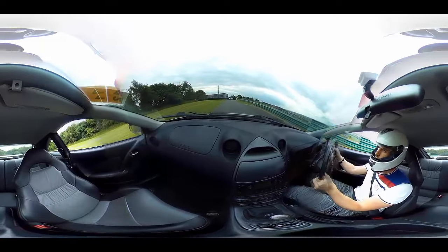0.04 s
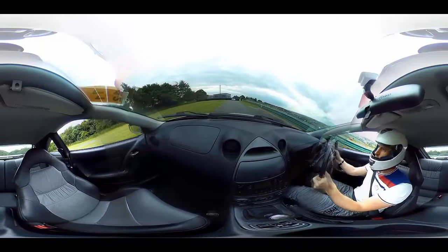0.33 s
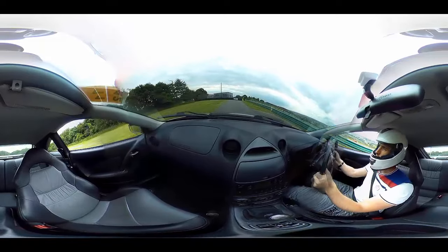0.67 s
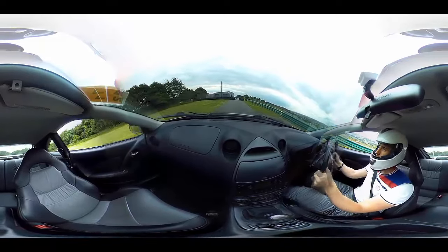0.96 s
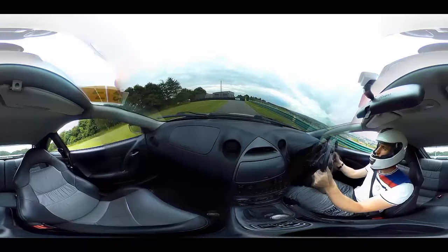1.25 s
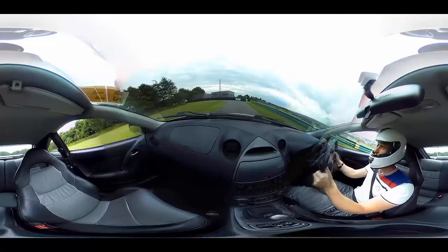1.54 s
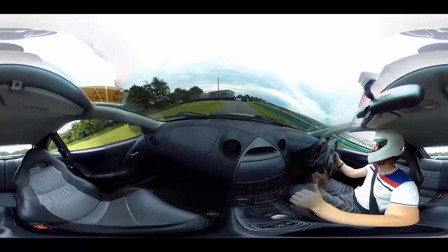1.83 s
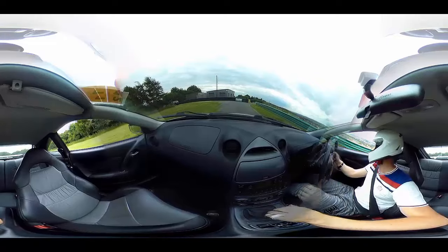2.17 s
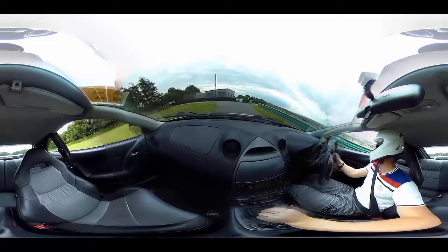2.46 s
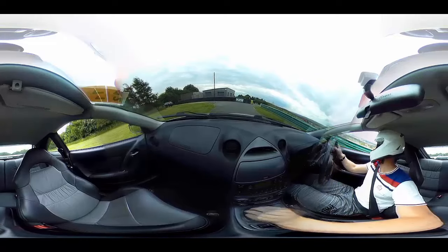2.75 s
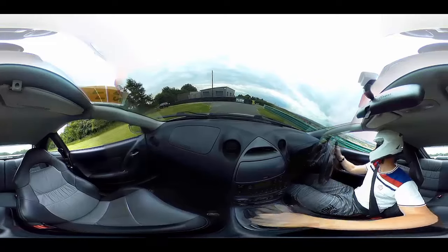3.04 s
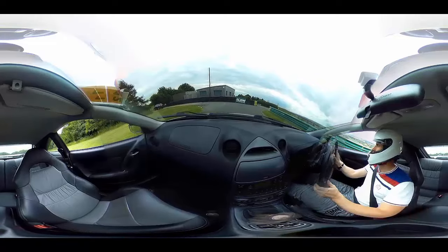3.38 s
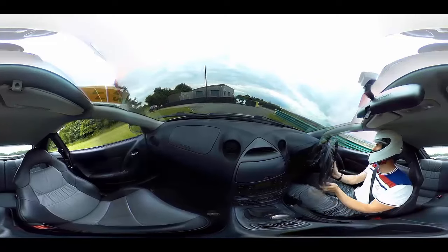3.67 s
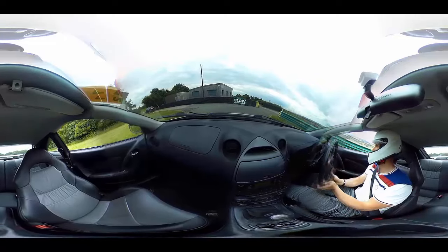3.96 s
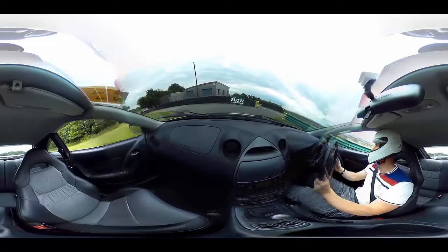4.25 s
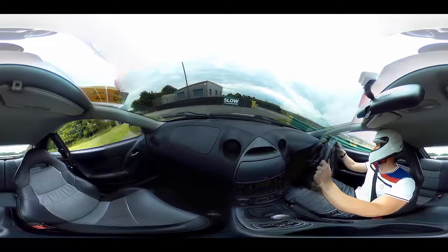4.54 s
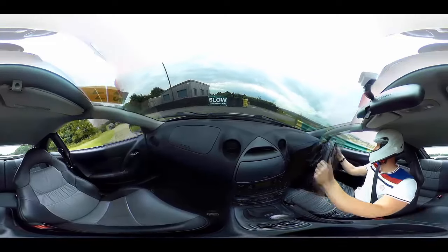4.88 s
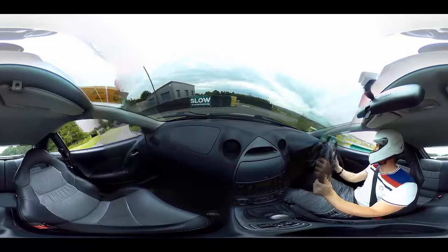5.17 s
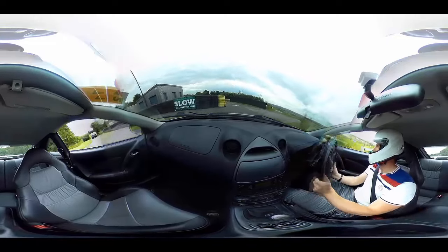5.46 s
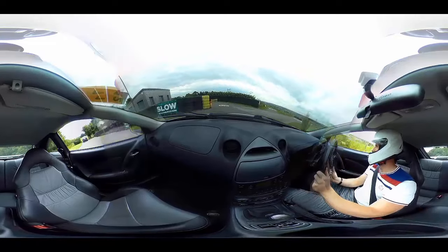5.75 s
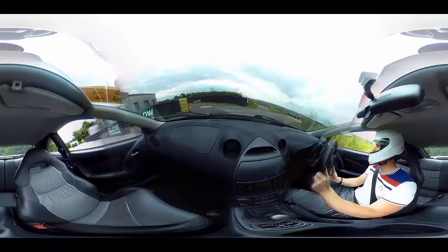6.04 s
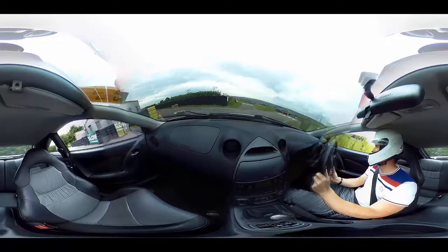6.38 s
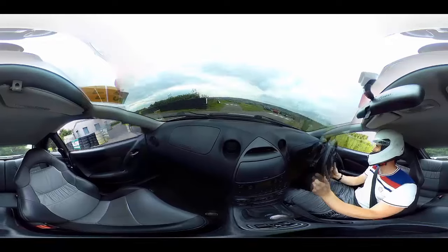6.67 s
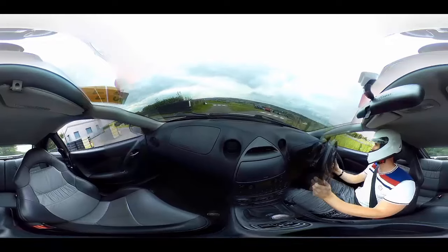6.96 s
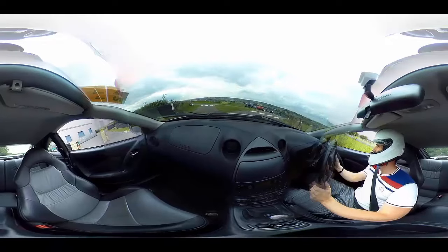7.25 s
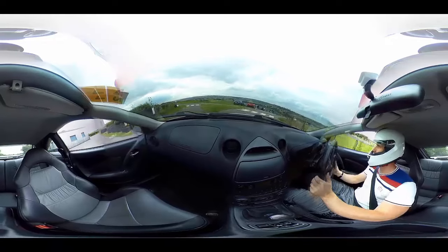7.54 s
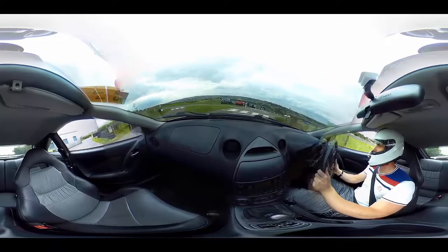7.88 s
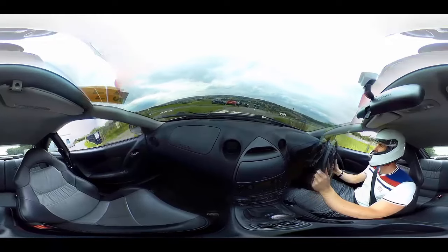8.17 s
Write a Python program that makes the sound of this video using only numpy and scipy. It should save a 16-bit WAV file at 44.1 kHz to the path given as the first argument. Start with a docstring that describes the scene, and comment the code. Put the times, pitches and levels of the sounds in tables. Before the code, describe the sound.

A car slows on a track, heard from the cabin: engine winding down, fading tyre roar, then plastic chatter, clicks and knocks.

```python
"""A car engine, heard from inside, falls from high revs to idle as the car slows on a track and turns.
Its overtones sweep through the cabin's resonances. While it shudders, a small loose part chatters
against its seat, then goes on ticking over the rough ground. The driver's hand knocks and scuffs
on the console and wheel, and plastic catches snap. Underneath, the body shakes and heaves on its
springs, and the rumble and roar of the tyres fade with the speed."""
import sys
import numpy as np
from scipy import signal
from scipy.fft import rfft, irfft, next_fast_len
from scipy.io import wavfile
from scipy.ndimage import uniform_filter1d

SR = 44100
rng = np.random.default_rng(int(sys.argv[2]) if len(sys.argv) > 2 else 0)


def int16_out(signal):
    """Quantize to a 16-bit WAV file."""
    q = np.round(np.clip(np.atleast_2d(signal).T, -1, 1) * 32767)
    wavfile.write(sys.argv[1], SR, q.astype(np.int16))


N = 366471
T = np.arange(N) / SR


# The falling revs. Each row: time in seconds, firing rate in Hz.
FIRING_RATE = [(0, 128.4), (.35, 118.6), (.7, 113), (1, 105.1), (1.7, 90.4), (2, 84), (2.3, 78.26),
               (2.65, 72.4), (3, 54.3), (3.3, 42.16), (3.7, 26.84), (4.2, 27), (5.2, 32), (5.75, 45.33),
               (6.4, 42.7), (7.1, 39.88), (7.6, 36.98), (8.31, 34.45)]
# The engine's faders. Each row: time in seconds, low tone in dB, overtones in dB.
ENGINE_LEVELS = [(0, -26.5, -40), (.45, -33, -54), (.8, -39.5, -46), (1.35, -37.5, -45), (1.58, -35, -51),
                 (1.7, -37.5, -44.5), (2, -40, -47.5), (2.45, -40.5, -53), (2.8, -32, -49.5),
                 (3.3, -35, -48.5), (3.9, -51, -47), (4.5, -44, -49), (5.6, -37, -63), (6.2, -32.5, -59),
                 (6.75, -30.5, -72), (7.2, -33.5, -49), (7.75, -48, -49.5), (8.31, -47, -64)]
# Each row: multiple of the firing rate, level in dB relative to the overtone fader.
OVERTONES = [(1.5, -4), (2, 2), (2.5, -7.5), (3, 1.5), (3.5, -12.5), (4, -5.5), (4.5, -16), (5, -8),
             (6, -12), (7, -21.5), (8, -25.5), (9, -18), (10, -19.5), (11, -18), (12, -25), (13, -19.5),
             (14, -19)]
# Air and panels lift passing overtones. Each row: centre in Hz, width in Hz, lift in dB.
CABIN_MODES = [(256, 46, 14), (740, 70, 7), (1120, 130, 7), (1310, 64, 11)]

def engine(waver=0.002, uneven=0.23, jitter_rad=0.044, rough_db=0.7):
    """A low tone and overtones sweep through the cabin's resonances, roughened by uneven firing."""
    firing_hz = curve(FIRING_RATE) * (1 + waver * drift(13))
    phase = 2 * np.pi * np.cumsum(firing_hz) / SR + jitter_rad * drift(31)
    overtones_db = curve(ENGINE_LEVELS, column=2) + rough_db * drift(35)
    partials = [(0.98, curve(ENGINE_LEVELS))]  # the low tone sits just under the firing rate
    for multiple, db in OVERTONES:
        partials.append((multiple, overtones_db + db + lift_db(multiple * firing_hz, CABIN_MODES)))
    out = np.zeros(N)
    for multiple, db in partials:
        gain = amp(db) * (1 + uneven * drift(3.4))
        out += gain * np.sin(multiple * phase + 2 * np.pi * rng.random())
    return np.sqrt(2) * out


# The loose part lands. Each row: start in seconds, strength in dB, hard edge in relative dB.
TICKS = [(3.6835, -29.5, -28), (3.7449, -14, -33), (3.7891, -14.5, -9), (3.8349, -13.5, -28),
         (3.8828, -16.5, -34), (3.9284, -31, -26), (3.9742, -19, -25), (4.0196, -17.5, -13),
         (4.066, -16, -33), (4.1142, -25, -22), (4.1617, -32, -32), (4.234, -45, -25), (4.2499, -44, -15),
         (4.281, -36.5, -20), (4.3022, -41, -25), (4.3321, -28, -26), (4.5543, -30.5, -13),
         (4.5753, -32, -7), (4.6066, -33, -9), (4.7314, -39, -25), (4.7481, -35, -32), (4.7806, -27.5, -21),
         (4.9574, -35, -25), (5.0146, -36, -10), (5.7739, -35, -22), (5.7937, -23, -26), (6.2284, -39, -20),
         (6.27, -41, -22), (6.3154, -37, -18), (6.4036, -35, -7), (6.4228, -26, -51), (6.4959, -39, -20),
         (6.627, -36, -12), (6.6465, -21.5, -22), (6.7284, -31.5, -11), (6.789, -23.5, -30),
         (6.8362, -27, -42), (6.9031, -31.5, -30), (6.9258, -25, -27), (6.955, -25, -8), (6.978, -20, -11),
         (7.0168, -41, -25), (7.0883, -47, -20), (7.1351, -31, -20), (7.1638, -39, -38), (7.1884, -27, -13),
         (7.488, -33, -32), (7.5087, -35, -31), (7.535, -28.5, -22), (7.555, -24.5, -45), (7.5845, -27, -3),
         (7.602, -29, -30), (7.7057, -32.5, -18), (7.7561, -29, -23), (7.813, -42, -21),
         (7.9875, -29.5, -22), (8.0378, -35, -39)]

def tick_contacts(stray_count=40, stray_db=-43, stray_hard_db=-20, spread_s=0.054, uneven_db=3):
    """Contacts as the loose part is jogged on its seat: the ticks, and faint stray touches nearby."""
    strays = []
    for k in rng.integers(len(TICKS), size=stray_count):
        start = TICKS[k][0] + spread_s * rng.standard_normal()
        strays.append((start, stray_db + uneven_db * rng.standard_normal(), stray_hard_db))
    return strays + list(TICKS)


# Bursts between the ticks. Each row: start in seconds, strength in dB.
CHATTERS = [(3.7245, -18), (3.77, -21), (3.8136, -21.5), (3.8598, -24.5), (3.9040, -24), (3.9495, -24),
            (3.9977, -28), (4.0440, -21), (4.0919, -28.5), (4.1398, -36.5)]
# The contacts of one burst. Each row: strength in relative dB, hard edge in relative dB.
CHATTER_PATTERN = [(-5.5, -4), (-3.5, 3), (-5, -4)]

def chatter_contacts(gap_s=0.0023, scatter_s=0.0003, uneven_db=4):
    """Contacts as the shuddering engine shakes the loose part against its upper stop."""
    contacts = []
    for start, db in CHATTERS:
        for n, (softer_db, hard_db) in enumerate(CHATTER_PATTERN):
            lands = start + n * gap_s + scatter_s * rng.standard_normal()
            contacts.append((lands, db + softer_db + uneven_db * rng.uniform(-1, 1), hard_db))
    return contacts


# The ticks' bright ring near 7 and 8.7 kHz.
# Each row: pitch in Hz, level in dB before the tilt, t60 in seconds.
TICK_MODES = [(6630, -19, 0.0046), (7100, 5.5, 0.003), (8680, 0, 0.0034)]
# Colours of the panel's tap and of the hard edge. Each row: frequency in Hz, level in dB.
PANEL_COLOUR = [(200, 12), (900, 3.5), (1600, 2.5), (2500, -2.5), (3400, -4), (4400, 0), (5400, -14),
                (11000, -30), (16000, -22)]
EDGE_COLOUR = [(1000, -10), (2000, -10), (5000, -20), (7500, -5), (9700, 21), (11800, -4), (13800, 4),
               (16000, -6)]

def rattle(contacts, detune=0.02, rise_s=0.00058, rebound=0.25, ring_db=2, ping_hz=14800):
    """Each contact gives a bright ring, a faint rebound, a click and a tap on the panel behind."""
    t = np.arange(2048) / SR
    band = signal.butter(4, [5900, 9900], "bandpass", fs=SR, output="sos")
    out = np.zeros(N)
    for start, db, hard_db in contacts:
        tilt_db = 20.5 + 0.87 * hard_db  # per octave: hard contacts favour the upper modes
        ring = np.zeros(len(t))
        for hz, mode_db, t60 in TICK_MODES:  # pitch and balance shift a little with every contact
            level_db = mode_db + tilt_db * np.log2(hz) + 2 * rng.standard_normal()
            shifted_hz = hz * (1 + detune * rng.standard_normal())
            ring += decay(t, level_db, t60) * np.sin(2 * np.pi * shifted_hz * t)
        ring *= 1 - np.exp(-t / rise_s)
        blows = decay(t, -27, t60=0.02) * rng.standard_normal(len(t)) / 2  # scatter off nearby surfaces
        blows[0] += 1
        blows[int(rng.uniform(0.0012, 0.004) * SR)] += rebound * rng.random()
        ring = signal.sosfilt(band, signal.fftconvolve(ring, blows)[:len(t)])
        ring *= amp(ring_db) / abs(ring).max()
        tap_db = -21 + 0.45 * db + 0.096 * hard_db  # the panel only partly follows the contact's force
        tap = noise(PANEL_COLOUR, size=len(t)) * decay(t, tap_db, t60=0.021) / 2
        edge = noise(EDGE_COLOUR, size=len(t)) * decay(t, hard_db - 5, t60=0.0049)
        ping = decay(t, -31, t60=0.002) * np.sin(2 * np.pi * ping_hz * t)
        add(out, start, amp(db) * (ring + ping + edge) + tap)
    return out


# Knocks on the console. Each row: start in seconds, level in dB, clatter t60 in seconds,
# brightness in dB per octave, ring pitch in Hz, hollow ring in relative dB, thud in dB.
KNOCKS = [(3.006, -40, 0.13, 4.5, 994, 15.5, -29.5), (3.029, -40.5, 0.064, -1, 1060, 12, -32.5),
          (3.102, -46, .04, -12, 1060, 8.5, -52), (3.315, -32.5, 0.076, -2.5, 1080, -13, -32),
          (3.329, -42, 0.096, 0.5, 1026, 12, -31), (6.8, -35, 0.065, 0, 660, -7, -55),
          (6.8056, -35, 0.053, -4, 670, 3, -50), (6.812, -33.5, 0.039, 1, 1465, 1, -58),
          (6.818, -30.5, 0.084, -4.5, 728, 5.5, -54), (6.831, -39, 0.062, -8, 1730, -4, -58),
          (6.996, -39, 0.089, -4, 934, 0, -55), (7.393, -32, 0.16, -7, 884, -10, -60),
          (7.532, -40.5, 0.081, -2, 1000, -17, -60), (7.562, -41, 0.054, -2, 993, -14, -60)]
# The trim's hollow ring. Each row: multiple of the ring pitch, level in dB, t60 in seconds.
TRIM_MODES = [(1, 0, .055), (2.02, -15, .03), (2.35, -19, .03), (2.85, -20, .035), (3.1, -22, .03),
              (3.85, -17, .035)]
# Colours of the clatter and of the thud. Each row: frequency in Hz, level in dB.
CLATTER_COLOUR = [(100, -23), (450, -1.5), (750, 1.5), (1500, 0), (2500, -9), (4000, -11), (5200, -21),
                  (7000, -15), (9000, -16), (12000, -33), (16000, -42)]
THUD_COLOUR = [(30, -26), (55, -8), (85, 24.5), (130, -8), (250, -2), (460, 7), (700, -49)]

def knocks(rise_s=0.0022, thud_t60=0.15):
    """Blows on damped plastic trim: a short clatter, a hollow ring and a dull thud."""
    t = np.arange(8192) / SR
    attack = 1 - np.exp(-t / rise_s)
    out = np.zeros(N)
    for start, db, t60, bright_db, ring_hz, hollow_db, thud_db in KNOCKS:
        clatter = noise(CLATTER_COLOUR, tilt_db=bright_db, size=len(t)) * decay(t, db, t60)
        ring = sum(decay(t, mode_db, mode_t60) * sine(t, multiple * ring_hz)
                   for multiple, mode_db, mode_t60 in TRIM_MODES)
        thud = noise(THUD_COLOUR, size=len(t)) * decay(t, thud_db, thud_t60)
        add(out, start, attack * (clatter + amp(db + hollow_db) * ring + thud))
    return out


# Catches and trim snapping. Each row: start in seconds, peak in dB.
SNAPS = [(3.01, -29), (3.028, -34), (3.331, -29), (4.194, -30), (4.2128, -21), (7.002, -33)]
# The clicks inside one snap. Each row: delay in seconds, relative gain.
SNAP_CLICKS = [(0, 0.85), (.0004, .8), (.00095, 1), (.0018, 0.32)]
# The colour of a snap. Each row: frequency in Hz, level in dB.
SNAP_COLOUR = [(600, -4), (1200, 5.5), (1900, 2), (2800, 4), (4500, -6), (6900, 1.5), (8000, -10),
               (9000, -1), (11000, -15)]

def snaps(click_t60=0.0032, tail_db=-21, tail_t60=0.013, top_hz=9000):
    """Plastic snaps: a few dry clicks within two milliseconds, scattered by the trim around them."""
    t = np.arange(2048) / SR
    envelope = decay(t, tail_db, tail_t60)
    for delay, gain in SNAP_CLICKS:
        add(envelope, delay, gain * decay(t, 0, click_t60))
    soft_plastic = signal.butter(8, top_hz, fs=SR, output="sos")
    out = np.zeros(N)
    for start, db in SNAPS:
        snap = signal.sosfilt(soft_plastic, envelope * noise(SNAP_COLOUR, size=len(t)))
        add(out, start, amp(db) * snap / abs(snap).max())
    return out


# Each row: start, swell and t60 in seconds, then dull rub, bright swish and airy fizz in dB.
SCUFFS = [(1.726, .004, .07, -44, -37, -46), (2.037, .0015, 0.075, -46, -43.5, -48),
          (2.435, .004, 0.073, -43, -49, -50), (2.808, .003, .046, -45, -51, -58),
          (3.899, 0.011, .17, -48, -46, -70), (4.036, 0.0072, 0.16, -61, -43, -75),
          (5.24, 0.12, 0.64, -71, -66, -51), (5.376, 0.0072, .18, -43.5, -48.5, -62),
          (5.39, 0.081, .4, -66, -56, -58), (5.487, 0.017, 0.13, -47, -36, -41),
          (5.651, 0.0074, 0.17, -51, -49, -64), (5.772, .009, .14, -48, -48, -69),
          (5.887, 0.0072, 0.079, -50, -48, -66), (6.2, .045, .4, -57, -52.5, -70),
          (6.807, 0.0059, 0.076, -39, -43, -78), (6.99, 0.005, .1, -46, -47, -78),
          (7.225, .01, .16, -43.5, -50.5, -68), (7.477, 0.0093, 0.15, -48, -53, -70),
          (7.654, 0.0052, 0.12, -44.5, -40.5, -56)]
# Colours of the rub, the swish and the fizz. Each row: frequency in Hz, level in dB.
RUB_COLOUR = [(150, 0), (600, 5.5), (1000, -2), (1600, 0.5), (2500, -11), (5000, -9), (12000, -28)]
SWISH_COLOUR = [(1000, -27), (2500, -13), (4000, 2), (5500, 2), (7000, 6.5), (8800, 12), (11000, -3),
                (15500, -17)]
FIZZ_COLOUR = [(3000, -25), (6500, -9), (9000, -5), (12000, -3), (15500, 2)]

def scuffs(grain_db=2, gain_db=-2):
    """Hands and sleeves brush the trim in brief, grainy strokes that swell and die away."""
    t = np.arange(SR // 2) / SR
    out = np.zeros(N)
    for start, swell_s, t60, rub_db, swish_db, fizz_db in SCUFFS:
        stroke = np.minimum(t / swell_s, 1) * decay(np.maximum(t - swell_s, 0), 0, t60)
        layers = [(rub_db, RUB_COLOUR), (swish_db, SWISH_COLOUR), (fizz_db, FIZZ_COLOUR)]
        friction = sum(amp(db) * noise(colour, size=len(t)) for db, colour in layers)
        add(out, start, stroke * friction)
    return out * amp(gain_db + grain_db * drift(240))


# Bumps in the track. Each row: time of the peak in seconds, body heave in dB, tyre ring in dB.
BUMPS = [(1.701, -42, -34), (2.88, -36, -51), (3.299, -36, -48.5), (3.76, -24.5, -36.5), (4.77, -48, -41.5),
         (5.62, -43, -45.5)]
TYRE_HZ = 228.3  # the air ringing inside the tyres

def bumps(length_s=0.26, heave_hz=28):
    """Each bump makes the body heave and the air in the tyres ring."""
    t = np.arange(0, length_s, 1 / SR)
    swell = np.sqrt(2) * np.sin(np.pi * t / length_s)
    out = np.zeros(N)
    for peak_s, heave_db, ring_db in BUMPS:
        swing = amp(heave_db) * sine(t, heave_hz) + amp(ring_db) * sine(t, TYRE_HZ)
        add(out, peak_s - length_s / 2, swell * swing)
    return out


# Faders for body shake, tyre ring, and tyre and wind roar. Each row: time in seconds, level in dB.
SHAKE_LEVELS = [(0, -26.5), (1.8, -31), (2.2, -32), (3.6, -35.5), (4.1, -30), (5.3, -31.5), (6.3, -31),
                (6.8, -26), (7.8, -32), (8.31, -31.5)]
TYRE_LEVELS = [(0, -29), (.8, -34), (1.4, -35.5), (2.2, -39.5), (3.4, -45), (4.3, -54.5), (5.8, -45.5),
               (6.8, -51.5), (7.5, -57), (8.31, -50)]
ROAR_LEVELS = [(0, -34.5), (1, -39.5), (2, -44.5), (3, -48), (3.5, -51.5), (3.9, -50.5), (4.6, -51.5),
               (6, -53.5), (6.9, -54), (8.31, -59.5)]
# Colours of the road bed, from lowest to highest. Each row: frequency in Hz, level in dB.
SHAKE_COLOUR = [(5, -26), (14, 5), (25, 10), (45, 12.5), (60, 4), (80, -4), (130, -11), (200, -43.5)]
RUMBLE_COLOUR = [(40, 1), (70, -9), (115, -2.5), (160, 3.5), (195, -4.5), (260, -5), (315, -15), (370, -9),
                 (450, -16.5), (540, -26.5), (900, -66)]
ROAR_COLOUR = [(250, -8), (500, -0.5), (700, 1), (820, -4), (1050, 2), (1500, -5.5), (2000, -10.5),
               (2800, -16), (4000, -17), (5500, -21), (7000, -18.5), (8800, -16.5), (10500, -25),
               (15000, -51)]
HISS_COLOUR = [(1000, 17), (4000, -9), (5600, -9), (6900, 4.5), (7800, 2), (8800, 5), (10500, -6),
               (12500, -28), (14000, -10), (16000, -6)]
# Resonant peaks that colour the roar, with a high sheen near 7 and 8.9 kHz.
# Each row: centre in Hz, width in Hz, lift in dB.
ROAR_PEAKS = [(435.6, 126, 14), (680, 84, 3), (920, 190, 3), (1290, 9.8, 8), (1543, 110, 2.5),
              (2294, 95, 6.5), (3170, 51, -1.5), (6900, 480, 4), (8860, 490, 6)]

def road(lumpy_db=0.84, rumble_follows=0.43, tyre_width_hz=6.3, patchy=0.25, grain_db=0.84, hiss_db=-57):
    """The body shakes, the tyres ring, and rumble and roar fade with the speed over a steady hiss."""
    roar_db = curve(ROAR_LEVELS)
    lumps_db = lumpy_db * drift(6.3)  # the surface is uneven
    shake = amp(curve(SHAKE_LEVELS) - 3 + lumps_db) * noise(SHAKE_COLOUR)
    rumble = amp(rumble_follows * roar_db - 15 + lumps_db) * noise(RUMBLE_COLOUR)
    phase = 2 * np.pi * TYRE_HZ * T
    tyres = drift(tyre_width_hz) * np.cos(phase) + drift(tyre_width_hz) * np.sin(phase)
    tyres *= amp(curve(TYRE_LEVELS))
    # uneven tarmac stirs now one band of the roar, now another
    bands = signal.stft(noise(ROAR_COLOUR, ROAR_PEAKS), nperseg=512)[2]
    patches = uniform_filter1d(rng.standard_normal(bands.shape), size=4, axis=0)
    patches = unit(uniform_filter1d(patches, size=8, axis=1))
    roar = unit(signal.istft(bands * np.exp(patchy * np.tanh(patches)))[1][:N])
    roar *= amp(roar_db + 1 + grain_db * drift(37))
    return shake + rumble + tyres + roar + amp(hiss_db) * noise(HISS_COLOUR)


def cabin(sound, wet_db=-18, t60=0.011):
    """The padded cabin adds a faint, very short tail."""
    t = np.arange(SR // 8) / SR
    tail = rng.standard_normal(len(t)) * decay(t, 0, t60) * (t > 0.002)
    return sound + amp(wet_db) * signal.oaconvolve(sound, tail / np.linalg.norm(tail))[:N]


def amp(db):
    """Decibels to gain."""
    return 10 ** (np.asarray(db) / 20)


def decay(t, db, t60):
    """An envelope that starts at db and falls 60 dB every t60 seconds."""
    return amp(db - 60 * t / t60)


def sine(t, hz):
    """A sine with a random starting phase."""
    return np.sin(2 * np.pi * (hz * t + rng.random()))


def unit(x):
    """Scales to rms 1."""
    return x / np.sqrt(np.mean(x ** 2) + 1e-20)


def curve(rows, column=1):
    """One column of a time table, at every sample."""
    rows = np.asarray(rows, float)
    return np.interp(T, rows[:, 0], rows[:, column])


def lift_db(hz, modes):
    """The boost that a set of resonances gives at a frequency."""
    return sum(db / (1 + (2 * (hz - centre) / width) ** 2) for centre, width, db in modes)


def noise(colour, modes=(), tilt_db=0, size=N):
    """Noise of rms 1 with a colour, resonances and a tilt per octave."""
    length = next_fast_len(size)
    hz = np.fft.rfftfreq(length, 1 / SR) + 1
    points_hz, points_db = np.transpose(colour)
    db = np.interp(np.log(hz), np.log(points_hz), points_db)
    db += lift_db(hz, modes) + tilt_db * np.log2(hz)
    return unit(irfft(rfft(rng.standard_normal(length)) * amp(db), length)[:size])


def drift(rate_hz):
    """A random wander of rms 1 that rolls off above the given rate."""
    length = next_fast_len(N)
    hz = np.fft.rfftfreq(length, 1 / SR)
    return unit(irfft(rfft(rng.standard_normal(length)) * np.exp(-(hz / rate_hz) ** 2), length)[:N])


def add(mix, start, sound):
    """Mixes a sound in at a start time in seconds."""
    part = mix[max(round(start * SR), 0):][:len(sound)]
    part += sound[:len(part)]


def scene():
    """Engine and road with the small, close sounds of the cabin, in mono."""
    driving = engine() + road() + bumps()
    close_sounds = rattle(chatter_contacts() + tick_contacts()) + snaps() + knocks() + scuffs()
    return (driving + cabin(close_sounds))[None]


def record(dry, whine_hz=13714.3, whine_db=-65, top_hz=15900):
    """Adds a thin electronic whine and cuts the highest treble."""
    whine = np.sqrt(2) * amp(whine_db) * np.sin(2 * np.pi * whine_hz * T)
    low_pass = signal.firwin(511, top_hz, window=("kaiser", 9), fs=SR)
    return signal.oaconvolve(dry + whine, low_pass[None], "same")


dry = scene()
out = record(dry)
int16_out(out)
```